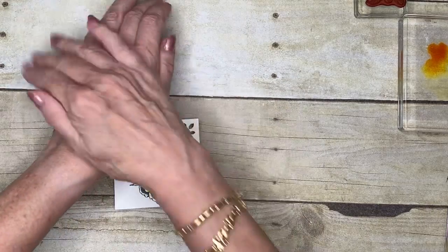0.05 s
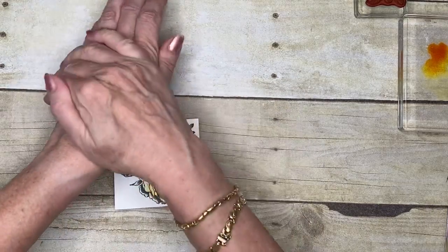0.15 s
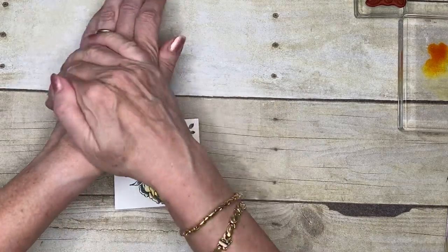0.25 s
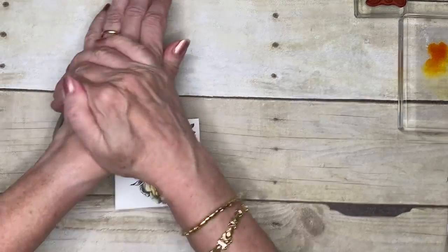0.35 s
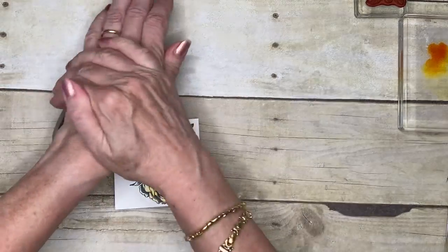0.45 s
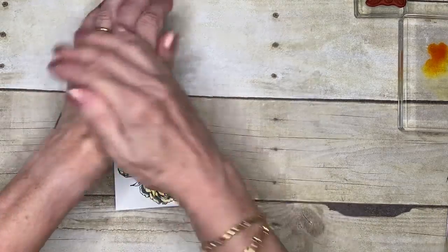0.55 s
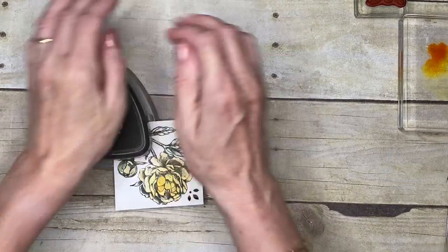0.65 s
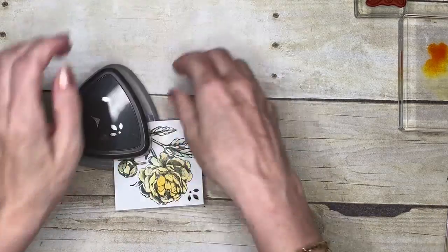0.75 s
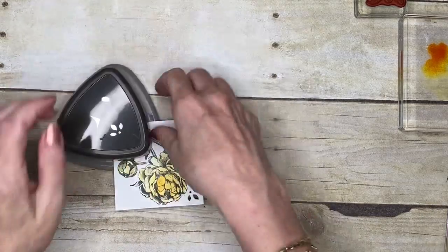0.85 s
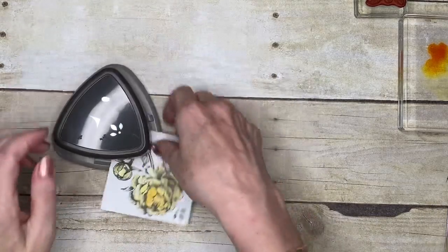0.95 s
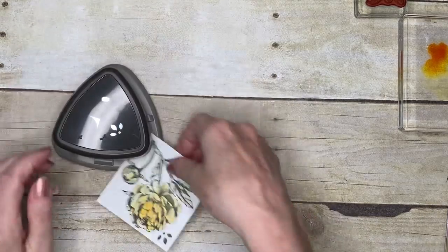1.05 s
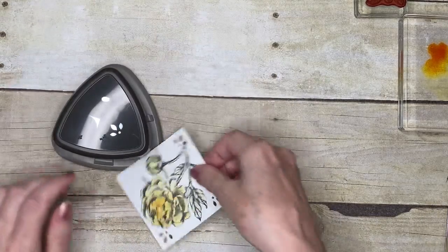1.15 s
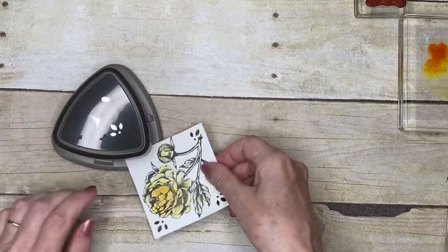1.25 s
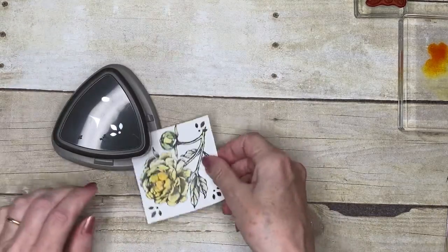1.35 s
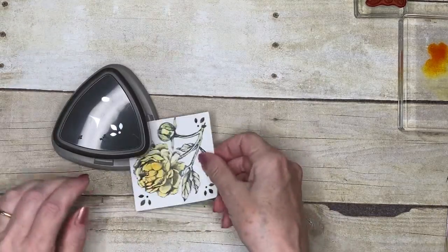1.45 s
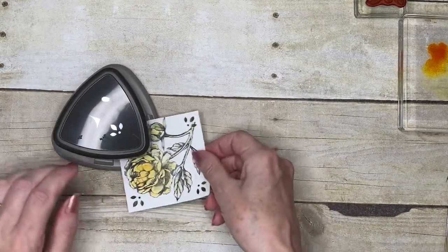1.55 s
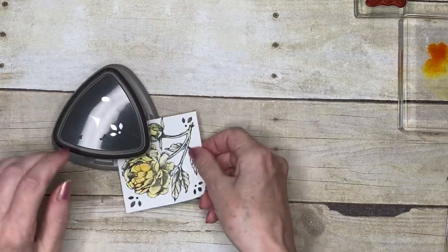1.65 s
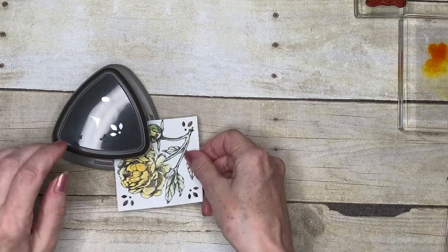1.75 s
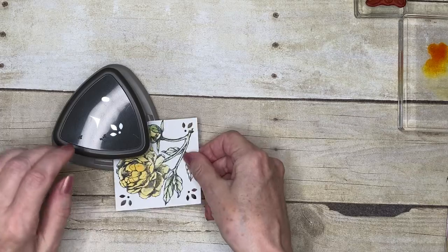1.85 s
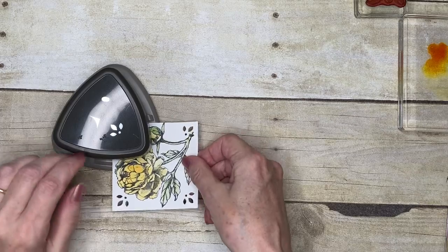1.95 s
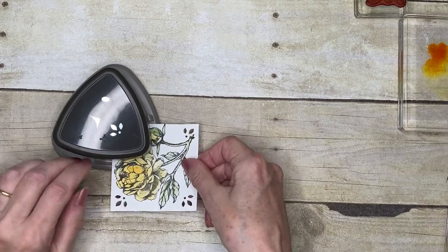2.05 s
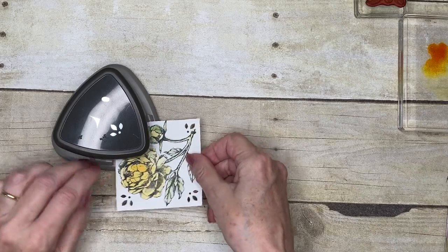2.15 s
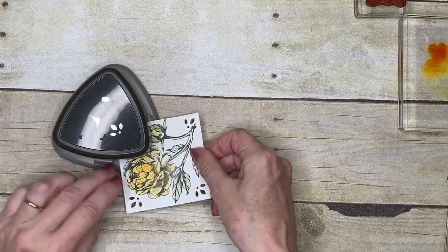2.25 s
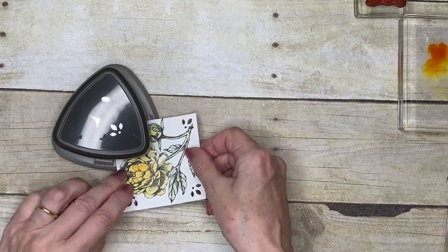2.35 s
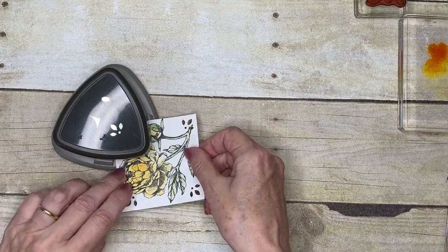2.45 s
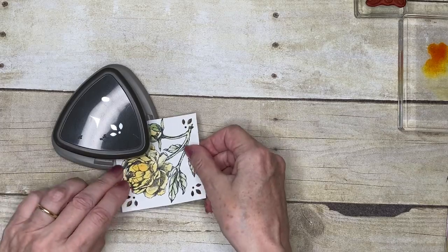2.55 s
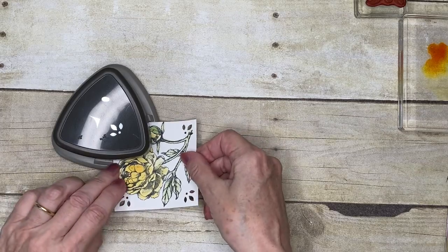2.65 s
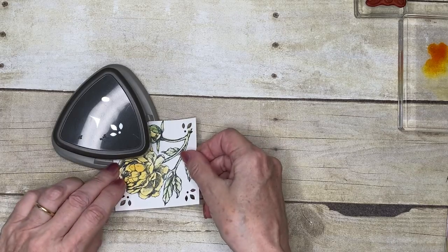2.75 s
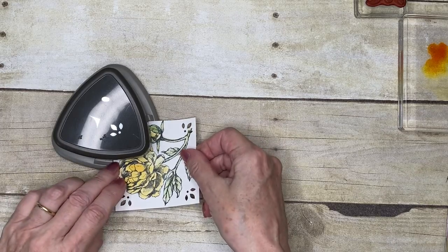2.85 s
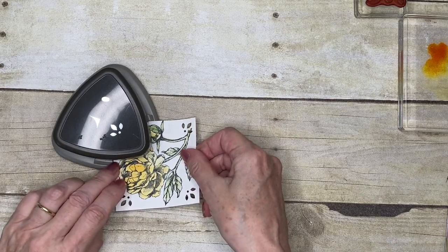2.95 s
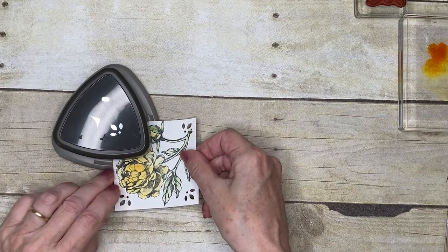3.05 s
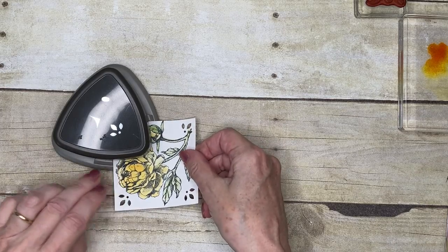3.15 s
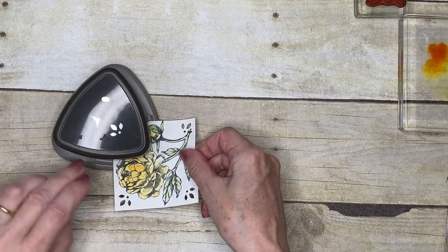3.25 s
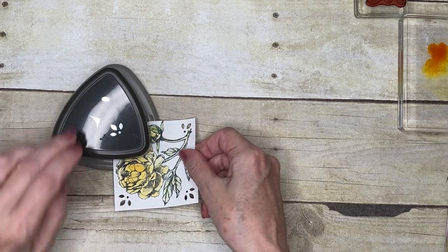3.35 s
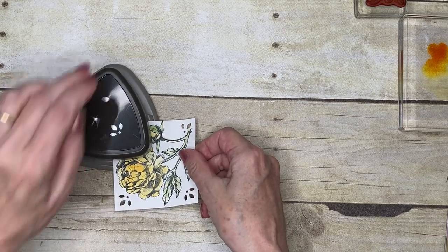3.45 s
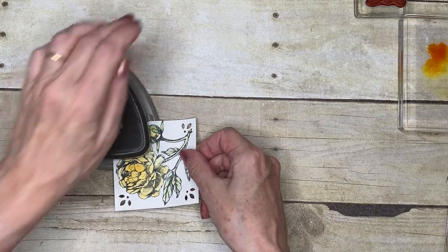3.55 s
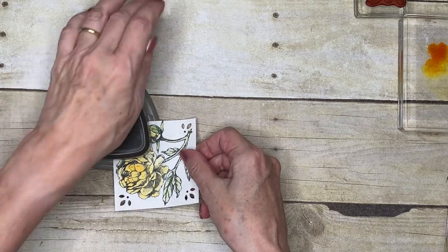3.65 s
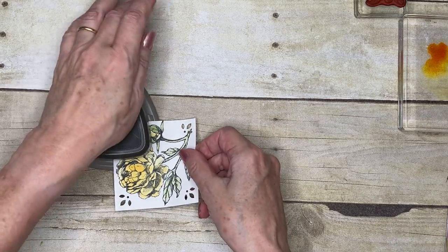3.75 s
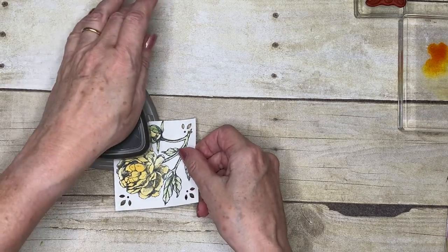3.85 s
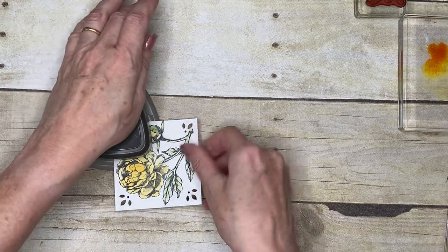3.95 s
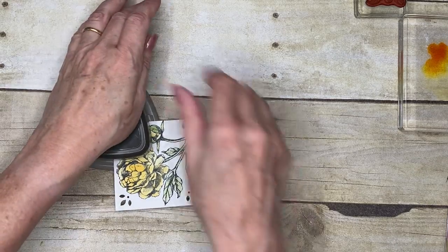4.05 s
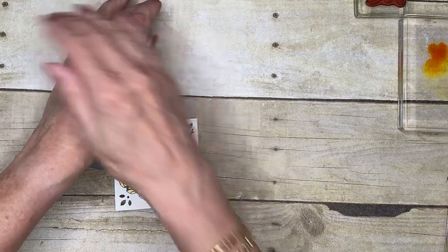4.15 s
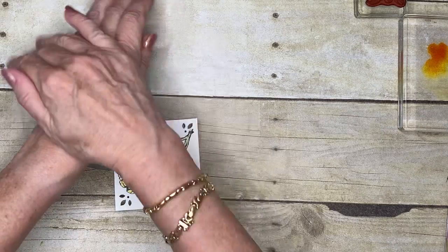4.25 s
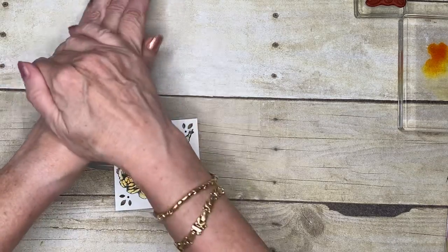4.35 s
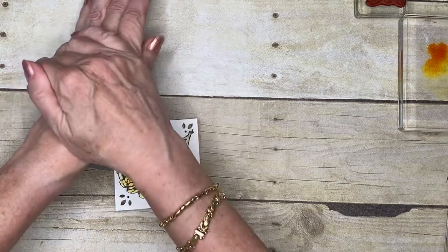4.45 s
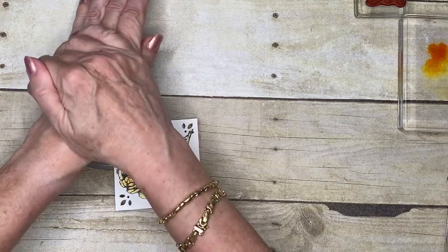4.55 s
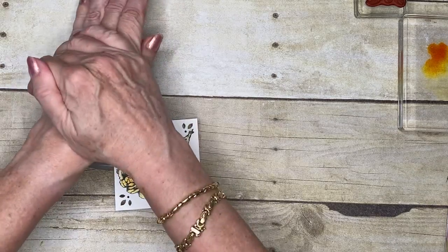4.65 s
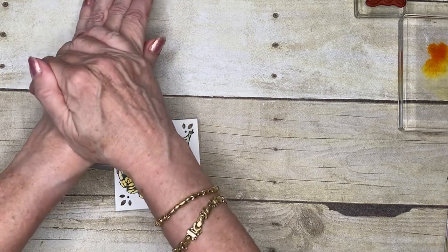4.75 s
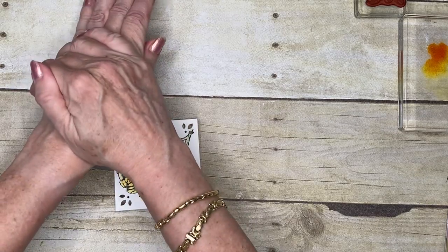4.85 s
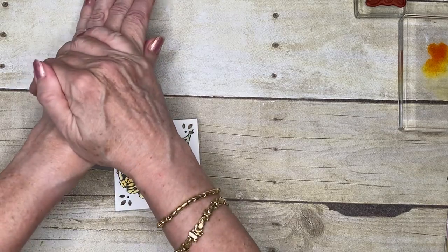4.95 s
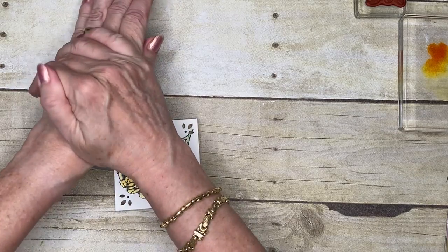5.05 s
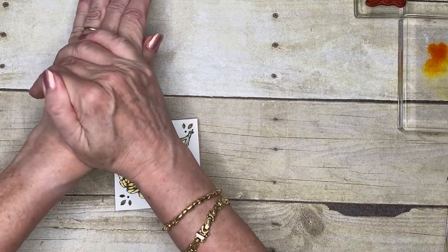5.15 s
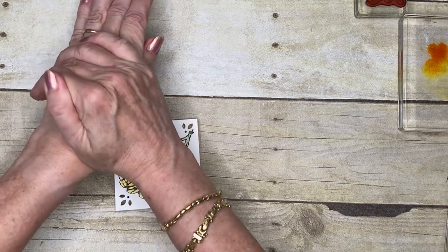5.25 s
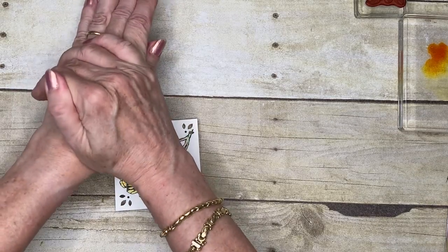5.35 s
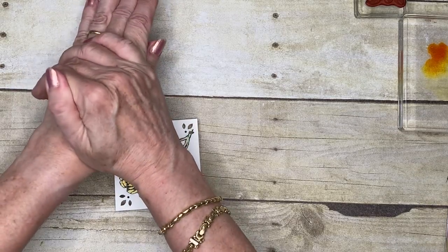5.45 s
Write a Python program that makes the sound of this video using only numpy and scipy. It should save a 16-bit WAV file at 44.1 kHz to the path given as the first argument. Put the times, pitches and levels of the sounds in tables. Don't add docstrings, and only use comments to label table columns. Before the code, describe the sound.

Sharp hollow plastic crunch with a table thud, a quieter release clack, papery scrapes and small ticks, then a duller second press in a quiet room.

```python
import sys
import numpy as np
from scipy import signal
from scipy.fft import rfft, irfft, next_fast_len
from scipy.io import wavfile
from scipy.ndimage import map_coordinates

SR = 44100
rng = np.random.default_rng(int(sys.argv[2]) if len(sys.argv) > 2 else 0)


def undo_db(level):
    steps = np.asarray(level, float) / 20
    return 10 ** steps


def materialize(psi):
    bounded = np.clip(np.atleast_2d(psi).T, -1, 1)
    quanta = np.round(bounded * 32767).astype(np.int16)
    wavfile.write(sys.argv[1], SR, quanta)


N = 242550


def unit(x):
    return x / np.sqrt(np.mean(x ** 2) + 1e-20)


def along(points, hz):
    f, v = np.transpose(points)
    return np.interp(np.log(hz + 1), np.log(f + 1), v)


def filtered(x, response):
    m = next_fast_len(N + SR // 2)
    return irfft(rfft(x, m) * response(np.fft.rfftfreq(m, 1 / SR)), m)[..., :N]


def noise(spectrum, channels=1):
    return unit(filtered(rng.standard_normal((channels, N)), lambda hz: undo_db(along(spectrum, hz))))


def wobble(rate):
    knots = rng.standard_normal(int(N * rate / SR) + 4)
    return map_coordinates(knots, [np.arange(N) * rate / SR])


def decay(t, db, t60, rise):
    return undo_db(db - 60 * t / t60) * (1 - np.exp(-t / rise))


def ring(t, hz, db, t60, rise):
    return decay(t, db, t60, rise) * np.sin(2 * np.pi * hz * t)


def add(track, s, x):
    part = track[round(s * SR):][:len(x)]
    part += x[:len(part)]


# start_s, peak_db, hollow_tone_hz, lid_db, crack_db
CUTTER_HITS = [(.277, -44, 1440, -25, -34.5), (0.294, -29, 1550, -26, -29.5), (0.3, -6, 1550, -25, -21.5),
               (0.302, -2, 1340, -6.5, -19.5), (0.306, -6, 1147, -21.5, -17),
               (.305, -16.5, 840, -29.5, -30.5), (0.307, -13, 525, -33.5, -16),
               (0.515, -35, 703, -11.5, -15.5), (0.5395, -17, 790, -12, -24.5),
               (0.542, -13.5, 980, -8.5, -21), (0.5444, -14.5, 1130, -5.5, -22),
               (0.549, -22, 1006, -3.5, -22), (.3085, -20, 620, -30, -30)]
# start_s, peak_db, hollow_tone_hz, lid_db, crack_db
SEATING_HITS = [
    (4.2995, -40, 1530, -15, -17),
    (4.3021, -12.5, 1150, -22, -24),
    (4.3025, -26, 774, -10, -30),
    (4.307, -21, 533, -32, -40),
    (4.3055, -25, 1400, -25, -35),
]
# start_s, peak_db, hollow_tone_hz, lid_db
CARD_TICKS = [(0.854, -38, 1290, -36), (0.915, -33.5, 1056, -15.5), (0.928, -38, 1040, -11),
              (0.956, -61.5, 640, 14.5), (1.029, -50, 950, 13), (1.124, -57.5, 1126, 8),
              (1.191, -32.5, 1192, 7), (1.246, -53.5, 916, -5.5), (1.425, -48.5, 1863, -3),
              (1.464, -49, 1170, 5), (1.489, -41.5, 1148, 2.5), (1.594, -51, 916, -8),
              (1.737, -62, 1050, 16.5), (1.894, -43, 1186, 5), (1.899, -47.5, 768, 2.5),
              (2.171, -49, 1055, 9.5), (2.3, -44.5, 1217, 6.5), (2.636, -31, 1197, 2),
              (2.7612, -54.5, 1200, 15)]
# start_s,
# peak_db, hollow_tone_hz, crack_db
LIGHT_TOUCHES = [(.017, -57.5, 1460, -18), (0.109, -36.5, 1300, -17), (0.734, -67, 915, 8),
                 (2.635, -65.5, 892, 17), (3.369, -58, 648, -22.5), (3.682, -62, 682, -8.5),
                 (3.762, -54.5, 677, -25), (3.789, -47, 1082, -33), (3.798, -51, 950, -22),
                 (3.803, -47, 900, -29.5), (3.83, -48, 916, -12), (3.839, -32.5, 670, -26),
                 (3.842, -40.5, 1050, -30), (3.946, -44.5, 1462, -19.5), (4.224, -69.5, 676, -17.5),
                 (4.244, -57, 740, -15), (4.49, -73.5, 903, 8.5), (4.757, -51.5, 981, 3),
                 (4.797, -43.5, 332, -34), (4.902, -56.5, 1710, -17.5), (2.182, -52, 996, -29),
                 (2.309, -47, 1000, -40.5), (2.765, -60, 1020, -29), (2.488, -74, 1100, -14),
                 (2.646, -48, 1300, -12), (2.633, -46.5, 2617, -12), (1.097, -51, 2330, -18),
                 (1.146, -51, 1830, -6.5), (1.327, -64, 2004, -4), (1.389, -60, 1910, -15.5),
                 (1.454, -54, 2300, -13.5), (3.909, -64.5, 1200, -20), (3.98, -48.5, 1500, -15),
                 (4.508, -70, 1512, -20), (4.845, -64, 3100, -19.5), (0.1092, -44, 695, -32)]
CUTTER_T60, SEATING_T60, CARD_T60, TOUCH_T60 = 0.0105, 0.007, 0.013, 0.016


def contacts():
    hits = [(*row, CUTTER_T60) for row in CUTTER_HITS]
    hits += [(*row, SEATING_T60) for row in SEATING_HITS]
    for s, db, hz, lid_db in CARD_TICKS:
        crack_db = -63 + 0.87 * (db + 38.5)
        hits.append((s, db, hz, lid_db, crack_db - db, CARD_T60))
    for s, db, hz, crack_db in LIGHT_TOUCHES:
        hits.append((s, db, hz, -8, crack_db, TOUCH_T60))
    return hits


# frequency_ratio, level_db
SHELL_MODES = [(0.448, -15), (0.621, -6.5), (.82, -8), (1, 10), (1.2, -10)]
# frequency_hz, level_db, t60_s
LID_MODES = [(1830, -2, 0.013), (2290, 5.5, 0.0065), (2673, 1.5, 0.015), (3100, -3.5, 0.012),
             (3538, -9.5, 0.0083), (4530, -20, 0.03)]
# frequency_hz, density_db_per_hz
CRACK_SPECTRUM = [(2000, -30), (3500, -4), (6000, -6), (8500, -3.5), (10500, 1), (12500, -5.5), (15300, -6),
                  (16000, -15), (16600, -45.5)]
# frequency_hz, density_db_per_hz
RATTLE_SPECTRUM = [(200, -27.5), (500, 1.5), (1200, 4.5), (2500, -11), (5000, -14), (8000, -30.5),
                   (15000, -28.5), (16500, -38.5)]


def shell():
    out, crack, shake = np.zeros(N), np.zeros(N), np.zeros(N)
    t = np.arange(SR // 5) / SR
    brief = t[:SR // 20]
    hits = contacts()
    luck = rng.standard_normal((len(hits), len(SHELL_MODES) + len(LID_MODES)))
    for (s, db, hz, lid_db, crack_db, t60), chance in zip(hits, luck):
        for (ratio, level), c in zip(SHELL_MODES, chance):
            add(out, s, ring(brief, hz * ratio, db - 0.5 + level + 1.9 * c, t60, rise=0.0011))
        for (mode_hz, level, life), c in zip(LID_MODES, chance[len(SHELL_MODES):]):
            mode = ring(brief, mode_hz * (1 + 0.033 * c), db + lid_db - 2 + level, 85 * life * t60, rise=0.0007)
            add(out, s, np.sign(c) * mode)
        add(crack, s, decay(t, db + crack_db + 14.5, 1.05 * t60, rise=0.0017))
        add(crack, s, decay(t, db + crack_db - 15.5, 0.089, rise=0.0017))
        add(shake, s, (t60 / CUTTER_T60) ** 2 * decay(t, db - 23.5, 0.13, rise=0.0025))
    rattle = unit(undo_db(1.3 * wobble(170)) * noise(RATTLE_SPECTRUM)[0])
    return out + crack * noise(CRACK_SPECTRUM)[0] + shake * rattle


# frequency_hz, level_db
SPRING_TONES = [(926, -65.5), (1007.6, -63.5)]


def spring():
    t = np.arange(N) / SR
    start_s, stop_s, fade_s, fall_db_per_s = 0.56, 0.87, 0.035, 25.5
    gate = np.clip((t - start_s) / fade_s, 0, 1) * np.clip((stop_s - t) / fade_s, 0, 1)
    fall_db = fall_db_per_s * np.clip(t - 0.7, -1, 1)
    out = np.zeros(N)
    for hz, db in SPRING_TONES:
        out += undo_db(db + 2.5 * wobble(24.3) - fall_db) * gate * np.sin(2 * np.pi * hz * t)
    return out


# start_s, weight_db, upper_modes_under_weight_db, knock_db
TABLE_PUSHES = [(0.3079, -7.5, -6, -20), (0.3112, -28, 7.5, -10.5), (0.342, -36, 11, -11.5),
                (.392, -44, -6, -23.5), (0.553, -25, -3.5, -27), (0.862, -65, -5.5, -48),
                (.92, -48, 2.5, -51.5), (1.245, -49.5, -3.5, -66), (2.651, -58, 6, -57.5),
                (3.802, -43, -6, -54.5), (3.857, -29, -7.5, -50), (4.263, -34, -15, -61),
                (4.318, -31, -1.5, -37)]
# frequency_hz, t60_s, under_slow_weight_db, under_quick_knock_db, first_side_under_weight (+1/-1)
TABLE_MODES = [(58, .33, -0.5, -30, 1), (80, 0.12, -6, -16.5, 1), (122, 0.2, -1.5, -11, -1),
               (172.6, 0.12, -25, -0.5, 1), (276, .11, -14.5, -8.5, 1)]
# frequency_hz, level_db, t60_s
BOARD_MODES = [(398, -11.5, 0.078), (480, -4, 0.013)]
# start_s, peak_db, pitch_hz, t60_s
PALM_THUDS = [(0.033, -46, 130, 0.09), (0.062, -35, 54.3, 0.17), (0.08, -27.5, 52.6, 0.19),
              (0.1149, -30, 170, 0.081), (0.3079, -12.5, 396, 0.025), (0.3121, -10, 125.4, 0.056),
              (0.311, -29.5, 405, 0.16), (0.3077, -13.5, 529, 0.031), (.32, -19.5, 125, .12),
              (0.5184, -17, 166.4, 0.053), (.553, -24, 199.4, 0.054), (1.246, -54, 384, 0.047),
              (3.805, -33.5, 168, 0.047), (3.821, -43.5, 149.3, 0.058), (3.8462, -20.5, 171, 0.053),
              (4.304, -21, 202.2, 0.029), (4.31, -18.5, 180, 0.0727), (4.351, -39, 190, 0.12),
              (4.7975, -38, 250, 0.05), (4.822, -42, 190.5, 0.052), (4.84, -44.5, 236, 0.046)]


def table():
    out, t = np.zeros(N), np.arange(SR // 2) / SR
    for s, weight_db, upper_db, knock_db in TABLE_PUSHES:
        for k, (hz, t60, slow_db, quick_db, side) in enumerate(TABLE_MODES):
            bend_db = weight_db + slow_db + upper_db * (k > 0)
            add(out, s, side * ring(t, hz, bend_db, t60, rise=0.0036))
            add(out, s, ring(t, hz, knock_db + quick_db, t60, rise=0.0011))
        for hz, db, t60 in BOARD_MODES:
            add(out, s, ring(t, hz, knock_db - 8 + db, t60, rise=0.0016))
    for s, db, hz, t60 in PALM_THUDS:
        add(out, s, ring(t, hz, db, t60, rise=0.18 / hz))
    return out


def strokes(rows, mix_db):
    t, gains = np.arange(N) / SR, np.zeros((3, N))
    for s, build, hold, release, db, bright in rows:
        first = max(round((s - 4 * build) * SR), 0)
        near = slice(first, round((s + hold + 4 * release) * SR))
        swing = np.maximum((s - t[near]) / build, (t[near] - s - hold) / release).clip(0)
        levels = undo_db(db + np.add(mix_db, [-bright, 0, bright]))
        gains[:, near] += levels[:, None] * undo_db(-20 * swing)
    return gains


def drags(rows, width, sag):
    out = np.zeros(N)
    for s, length, hz, db in rows:
        t = np.arange(round(length * SR) + 64) / SR
        u = t / t[-1]
        rough = map_coordinates(rng.standard_normal(400), [2 + np.minimum(t * hz * width, 390)])
        edges = np.clip(np.minimum(u, 1 - u) * 8, 0, 1)
        tone = np.sin(2 * np.pi * hz * t * (1 - sag * u / 2))
        add(out, s, undo_db(db - 4.5 * u) * edges * rough * tone)
    return out


# hardest_s, build_up_s, let_go_s, level_db, brightness_db
CARD_SLIDES = [(.865, 0.012, 0.011, -61.5, 20), (.895, 0.048, 0.11, -57, -8.5),
               (.95, 0.058, 0.27, -64.5, 9.5), (1.03, 0.027, 0.15, -54.5, -4),
               (1.15, 0.043, 0.076, -63, 6.5), (1.21, 0.037, 0.065, -56, -9.5), (1.32, .02, 0.29, -61.5, 5),
               (1.46, 0.032, 0.089, -59.5, -10), (1.58, 0.079, 0.2, -67.5, -8.5),
               (1.76, 0.099, 0.038, -57, -1.5), (1.91, 0.031, 0.022, -61, 10),
               (2.125, 0.0049, 0.18, -70.5, 1), (2.19, 0.049, 0.051, -60.5, -5),
               (2.31, 0.068, 0.13, -67, -11.5), (2.53, 0.027, 0.068, -81, -6.5),
               (2.61, 0.041, 0.044, -58.5, -3.5), (2.645, 0.014, 0.063, -58.5, -2.5),
               (2.66, 0.012, 0.13, -74, 1.5), (2.765, 0.026, 0.054, -66, -4), (2.635, .008, .006, -56, 0),
               (2.492, .004, .08, -63, -1), (1.893, .006, .01, -64, 0), (2.17, .006, .01, -68, 0),
               (1.1, .015, .02, -73, 14), (1.375, .03, .03, -71, 14), (1.66, .02, .04, -69, 2),
               (2.85, .05, 0.056, -79, -3.5)]
# hardest_s, build_up_s, let_go_s, level_db, brightness_db
SKIN_RUBS = [(.035, 0.033, 0.11, -73.5, -13.5), (.07, 0.019, 0.058, -87, 25), (.11, 0.062, 0.22, -69, 1),
             (.285, 0.022, 0.033, -58, 1), (.296, 0.0063, 0.012, -41, -5), (.537, 0.054, 0.0096, -44, -3.5),
             (.708, 0.022, 0.047, -86.5, -7.5), (.738, 0.015, 0.059, -72, 9.5),
             (3.374, 0.023, 0.023, -78, -14), (3.686, 0.021, 0.039, -62.5, -2),
             (3.77, 0.016, 0.036, -71, -8.5), (3.8, 0.017, 0.021, -54, -8.5), (3.93, .04, .02, -67, -2.5),
             (4.32, 0.039, 0.086, -68.5, -13.5), (4.84, 0.034, 0.079, -75, 14),
             (3.835, 0.023, 0.015, -51, 0.5), (3.87, 0.019, 0.045, -90, -16),
             (4.25, 0.061, 0.034, -84, -10), (3.99, 0.061, 0.02, -51.5, 2.5), (3.0, .04, 0.067, -79, 2),
             (3.62, 0.046, 0.039, -77.5, -1), (4.35, 0.12, 0.068, -77.5, -7), (4.45, 0.053, 0.046, -74, 2),
             (4.74, 0.2, 0.02, -72, -5), (4.301, .012, .004, -61, 8), (.108, .008, .006, -66, 0),
             (3.948, .004, .02, -56, -2), (4.63, .05, .06, -74, -6), (4.758, 0.004, 0.04, -57, 3),
             (4.86, .08, .06, -64, 5), (3.797, .003, .006, -54, 4), (3.682, .003, .006, -64, 5),
             (3.74, .004, .008, -68, 2), (4.8, 0.044, 0.084, -76.5, -18.5),
             (5.146, 0.047, 0.032, -88.5, 17.5), (5.184, 0.016, 0.034, -87, -15.5),
             (5.44, 0.2, 0.057, -71.5, -3.5)]
# start_s, length_s, level_db, brightness_db
STEADY_WIPES = [
    (0.854, 0.36, -68, 2),
    (1.299, 0.42, -70.5, -0.5),
    (1.99, 0.41, -89.5, -3),
    (2.489, 0.062, -67, -0.5),
    (2.962, 0.19, -89, -6),
    (3.932, 0.044, -56.5, -3),
    (4.429, 0.29, -79, 1.5),
    (4.752, 0.16, -64, 3),
]
# start_s, length_s, pitch_hz, level_db
EDGE_DRAGS = [(0.274, 0.026, 1490, -41), (4.29, .011, 1586, -55.5), (0.859, 0.072, 1361, -48.5),
              (1.029, 0.14, 2475, -56), (1.2, 0.05, 2193, -54), (1.373, 0.09, 1940, -67),
              (1.535, 0.17, 2680, -69.5), (1.731, 0.044, 2485, -60.5), (2.18, 0.054, 2485, -84),
              (2.307, 0.043, 1218, -62), (2.505, 0.038, 2680, -60.5), (.04, 0.047, 646, -59.5),
              (3.945, 0.053, 1467, -54), (3.972, 0.029, 2330, -57.5), (4.306, 0.068, 1750, -57),
              (4.306, 0.081, 610, -67)]
# start_s, length_s, pitch_hz, level_db
SHELL_CREAKS = [(4.04, .12, 1320, -84), (4.1, .06, 1680, -85), (4.58, .1, 480, -78), (4.5, .17, 3650, -79),
                (4.6, .1, 2050, -81), (4.58, .07, 1000, -78), (2.97, .2, 1500, -87), (3.0, .15, 4500, -88),
                (4.15, .07, 560, -80), (4.04, .06, 520, -80), (4.84, .04, 4600, -75),
                (5.36, .13, 2100, -86), (2.03, .09, 1500, -80)]
# frequency_hz, density_db_per_hz
BODY_SPECTRUM = [(210, -45.5), (350, -13.5), (503, -5), (569, -12.5), (1020, -2), (1490, -10), (1800, -14),
                 (2340, -32.5), (3960, -120)]
SCRAPE_SPECTRUM = [(900, -40.5), (1500, -11), (2100, -3), (2500, -3), (3200, -7), (4200, -10.5),
                   (5500, -17.5), (6500, -26.5), (9000, -120)]
HISS_SPECTRUM = [(2500, -39.5), (4000, -2), (6000, -6.5), (8500, 1.5), (12000, -1), (15300, -7),
                 (16000, -21.5), (16600, -50)]


def rubbing():
    def brief(rows):
        return [(s, build, 0, release, db, bright) for s, build, release, db, bright in rows]

    wipe_rows = [(s, 0.0025, hold, 0.012, db, bright) for s, hold, db, bright in STEADY_WIPES]
    card = strokes(brief(CARD_SLIDES), (-11, -7, -7.5))
    skin = strokes(brief(SKIN_RUBS), (-3.5, -3, -6)) + strokes(wipe_rows, (-10, -7, -12))
    out = drags(EDGE_DRAGS, width=0.3, sag=0.1) + drags(SHELL_CREAKS, width=0.09, sag=0)
    for gains, grain_db in ((card, 2.2), (skin, 1.2)):
        grain = grain_db * (wobble(200) + 0.5 * wobble(16))
        for gain, spectrum in zip(gains, (BODY_SPECTRUM, SCRAPE_SPECTRUM, HISS_SPECTRUM)):
            out += gain * unit(undo_db(grain + 2.5 * wobble(50)) * noise(spectrum)[0])
    return out


# delay_s, level_db
SIDE_ECHOES = [(.0021, -2.5), (.0047, -6), (.0083, -6.5), (.013, -9)]
# frequency_hz, level_db
SIDE_COLOUR = [(50, -31), (120, -14), (300, -13.5), (1000, -13), (2500, -9), (5000, -19.5), (15000, -30)]


def sideways(x):
    def echoes(hz):
        return sum(undo_db(db) * np.exp(-2j * np.pi * hz * s) for s, db in SIDE_ECHOES)

    return np.array([[1], [-1]]) * filtered(x, lambda hz: undo_db(along(SIDE_COLOUR, hz)) * echoes(hz))


# frequency_hz, t60_s
ROOM_T60 = [(100, .8), (500, 0.4), (2000, 0.38), (6000, 0.42), (15000, 0.3)]
# frequency_hz, level_db
DIFFUSE_COLOUR = [(100, -18.5), (300, -3), (600, 1.5), (1300, 0.5), (2500, 4), (6000, 3.5), (15000, -2)]


def room(x):
    step = SR // 5
    wet = np.zeros((2, N + SR + step))
    for start in range(0, N, step):
        hz, _, z = signal.stft(rng.standard_normal((2, SR // 2)), SR, nperseg=256)
        t = np.arange(z.shape[-1]) * 128 / SR
        tail = signal.istft(z * undo_db(-60 * t / along(ROOM_T60, hz)[:, None]), SR, nperseg=256)[1]
        part = signal.fftconvolve(x[None, start:start + step], tail / np.linalg.norm(tail[0]), axes=1)
        wet[:, start:start + part.shape[1]] += part
    delay_s = 0.0049
    return filtered(wet[:, :N], lambda f: undo_db(along(DIFFUSE_COLOUR, f)) * np.exp(-2j * np.pi * f * delay_s))


# frequency_hz, density_db_per_hz
AIR_SPECTRUM = [(12, -57.5), (20, -25.5), (62, 1.5), (121, -7.5), (169, -10), (237, -24), (300, -27.5),
                (393, -29), (521, -25.5), (690, -35.5), (1180, -33), (2500, -44.5), (14500, -51),
                (16300, -71.5)]
# frequency_hz, correlation (-1 to 1)
AIR_LIKENESS = [(60, 0.53), (130, 0.97), (290, 0.17), (640, -0.31), (1410, -0.61), (3100, 0.066),
                (6820, 0.64), (15000, 0.12)]


def air():
    def mid_side(hz):
        angle = np.arccos(np.clip(along(AIR_LIKENESS, hz), -1, 1)) / 2
        return np.array([np.cos(angle), np.sin(angle)])

    mid, side = filtered(noise(AIR_SPECTRUM, channels=2), mid_side)
    return undo_db(-58.5 + 0.4 * wobble(4.2)) * unit(np.array([mid + side, mid - side]))


# frequency_hz, lead_rad
PORT_LEAD = [(0, 0), (1500, -.05), (2400, -.5), (3500, -1), (5000, -1)]
# frequency_hz, difference_db
PORT_TILT = [(60, 2), (110, 1), (200, 0.6), (380, 0.4), (700, 0.2), (1290, 0.1), (2380, -0.8), (4400, 0),
             (8120, 0), (15000, 0)]


def scene():
    near = shell() + spring() + table() + rubbing()
    half = np.array([[0.5], [-0.5]])
    ports = filtered(near, lambda hz: undo_db(half * along(PORT_TILT, hz)) * np.exp(1j * half * along(PORT_LEAD, hz)))
    return ports + sideways(near) + undo_db(-15.5) * room(near) + air()


def roll_off(x):
    return signal.sosfilt(signal.butter(12, 16820, fs=SR, output="sos"), x)


# frequency_hz, share (0-1)
MERGED_SHARE = [(3800, 0), (5500, 0.1), (6800, 1), (8000, 1)]


def record(dry):
    def bass_cut(hz):
        return (1j * hz / (1j * hz + 34)) ** 2

    def share(hz):
        return np.clip(along(MERGED_SHARE, hz), 0, 1)

    def shift(hz):
        return np.exp(1j * np.pi * np.array([[1], [-1]]) * (hz - 8050) / 3380)

    own = filtered(dry, lambda hz: bass_cut(hz) * np.sqrt(1 - share(hz)))
    merged = filtered(dry[0], lambda hz: np.sqrt(share(hz)) * shift(hz))
    return roll_off(own + merged)


dry = scene()
out = record(dry)
materialize(out)
```